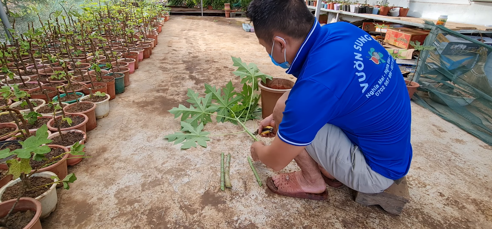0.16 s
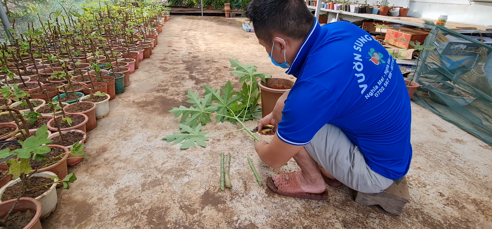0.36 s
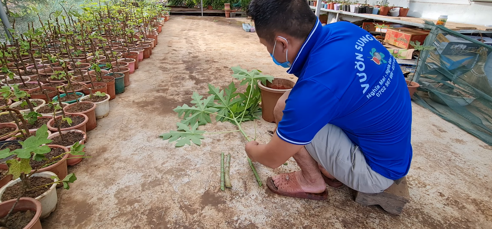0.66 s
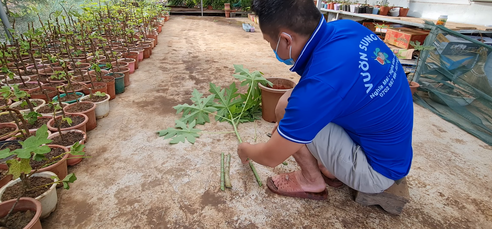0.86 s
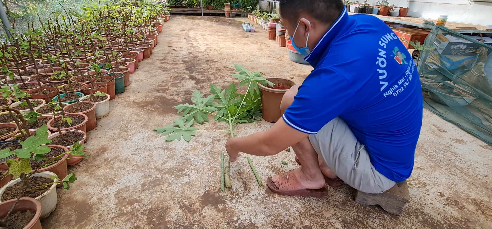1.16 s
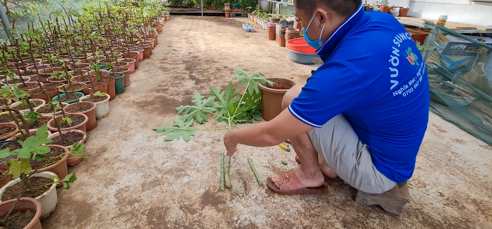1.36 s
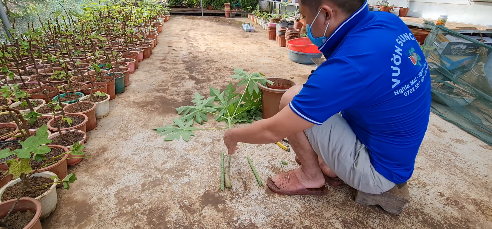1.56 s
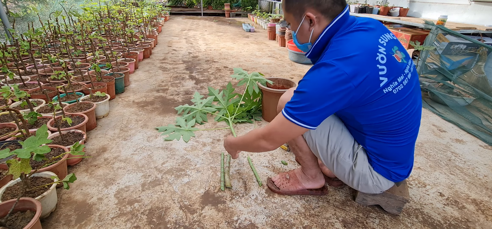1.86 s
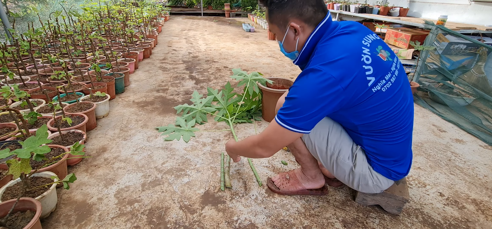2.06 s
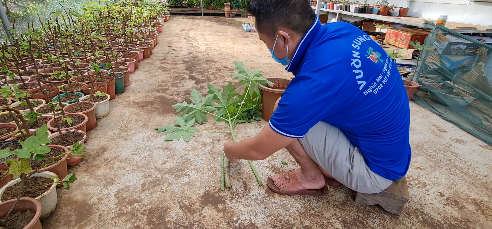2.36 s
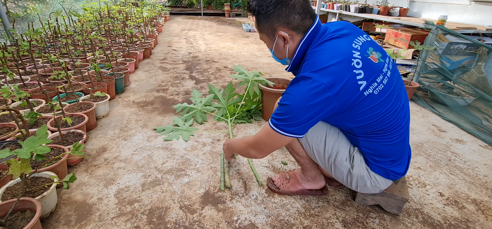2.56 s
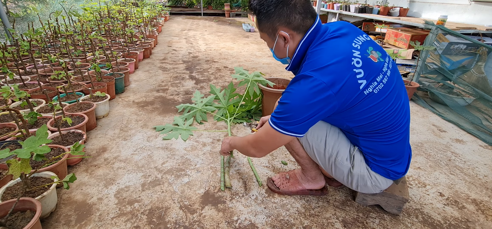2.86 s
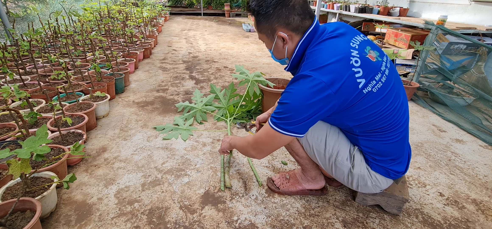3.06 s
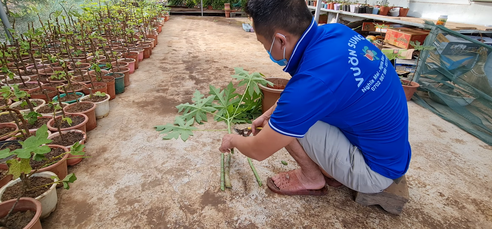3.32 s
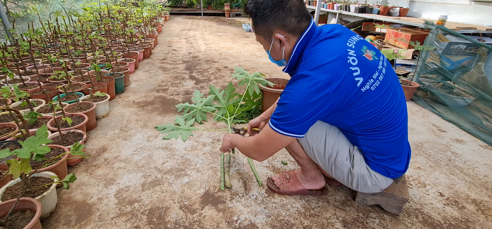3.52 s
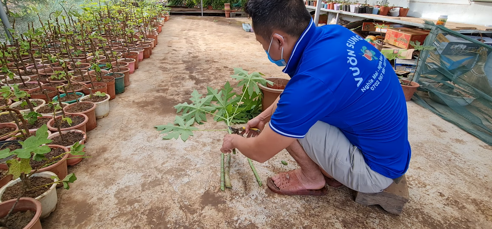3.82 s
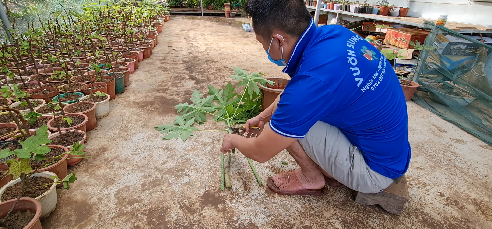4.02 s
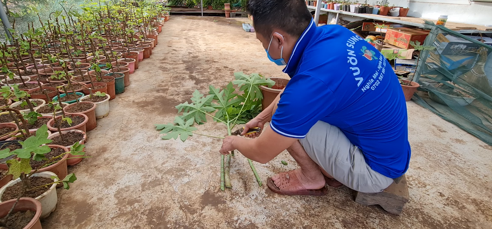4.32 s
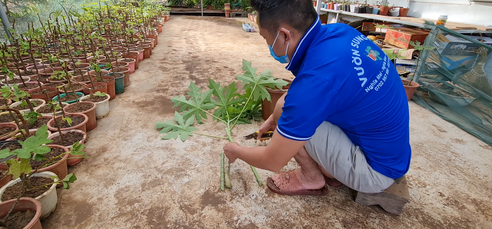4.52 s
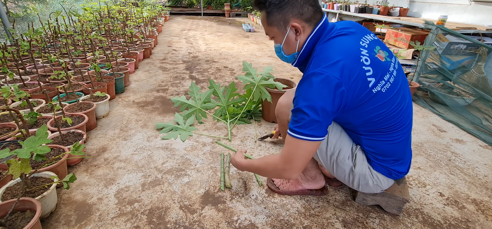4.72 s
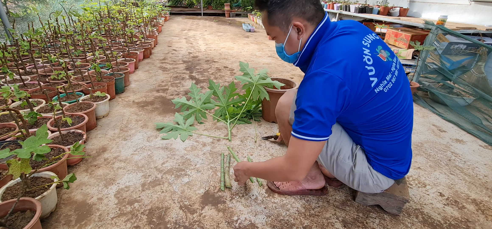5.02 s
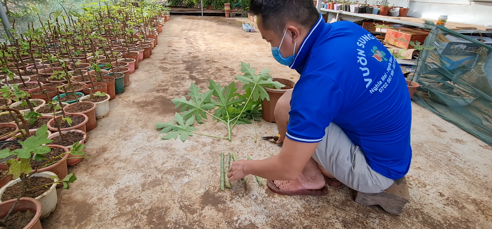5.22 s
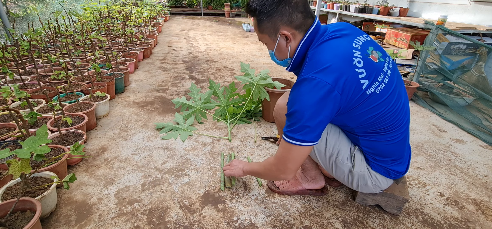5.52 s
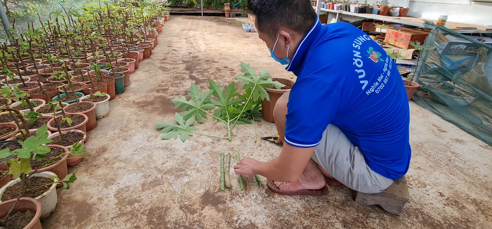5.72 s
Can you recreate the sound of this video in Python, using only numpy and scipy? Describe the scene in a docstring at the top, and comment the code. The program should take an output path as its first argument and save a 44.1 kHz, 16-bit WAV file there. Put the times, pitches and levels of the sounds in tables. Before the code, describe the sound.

Leaves rustle faintly close to the microphones in a roofed plant nursery. At about 0.7 seconds pruning shears crunch into a green stem and snap shut, and the stem cracks and knocks loudly until about 0.9 seconds, with a short echo from the roof. A sandal scrapes softly on gritty concrete just after 1 second. Between 2.1 and 2.8 seconds come lighter knocks, clicks of the shears and a little leaf rustle. At about 4.3 seconds a brief crunch ends in the second cut, one sharp, bright snap with a short metallic ring. Small ticks and a dull bump follow until 4.8 seconds. Around 5.7 seconds a few soft bumps land with two tiny pings. Throughout, the background stays very quiet: open air, pulsing insects, a machine's hum and a distant engine that swells now and then, with faint far animal calls from about 2.4 seconds.

```python
"""A roofed plant nursery, concrete floor, a pair of microphones close to the work.
Pruning shears cut a green stem twice: the blade crunches through wet fibres and snaps shut,
the stem cracks and knocks, and the roof answers after a short gap. Between the cuts leaves rustle,
a sandal scrapes and the shears click; two short pings sound as the last bumps land.
Far off an animal calls, over insects, an engine's drone, a machine's hum and the open air."""
import sys
import numpy as np
from scipy import signal
from scipy.fft import rfft, irfft
from scipy.io import wavfile
from scipy.ndimage import uniform_filter1d

SR = 44100
rng = np.random.default_rng(int(sys.argv[2]) if len(sys.argv) > 2 else 0)


def dump_mix(stems):
    """Bounce the given channels to the path in sys.argv[1] as a 16-bit WAV at rate SR."""
    frames = np.atleast_2d(stems).T  # one column per channel
    limited = np.clip(frames, -1, 1)  # hard clip at full scale
    pcm = np.round(limited * 32767).astype(np.int16)
    wavfile.write(sys.argv[1], SR, pcm)


N = 259308

# Blows close to the microphones. Each row: start in seconds, energy in dB, fade in seconds, treble
# tilt in dB per octave, resonance in Hz, its boost in dB, left over right in dB.
BLADE_SNAPS = [(.7720, -4.5, 0.003, -3.5, 2500, 1, -2.5), (.7733, -9.5, 0.0013, -5, 2700, 7.5, 13.5),
               (.786, -12.5, .005, -3.5, 2965, 7.5, 9.5), (2.3675, -25, 0.0079, 0, 6740, -0.5, -0.5),
               (2.552, -20.5, 0.023, -3.5, 5200, -3, 0), (2.5778, -19, 0.0036, 1, 4400, -0.5, 0),
               (2.773, -43, 0.0047, -2.5, 3340, 16, -1), (3.607, -35.5, 0.0022, -7, 1570, 20.5, -3.5),
               (4.2700, -4, 0.0015, 1.5, 3840, 3, 0), (4.2712, 5, 0.00036, 1.2, 4500, 10.5, -1),
               (4.2740, -8, 0.0018, 0.5, 4360, 4, 5.5), (4.474, -29.5, 0.0077, 5, 3070, 10.5, -1),
               (4.778, -35.5, 0.0043, -10, 6480, 8.5, 0.5), (4.824, -37, 0.0042, -9, 2900, 2, -3)]
STEM_KNOCKS = [(.7347, -16.5, 0.003, 3.5, 2190, 12, -1), (.8277, -2, 0.0011, 0, 2920, 1, 2.5),
               (.8290, 2.5, 0.0021, 1.5, 1200, 7, -2), (.9222, -6, 0.0018, -6.5, 1760, 8, -1),
               (.9238, -9, 0.0057, 6.5, 7100, 10.5, -0.5), (2.1548, -27.5, 0.013, -9.5, 2900, 11, 0.5),
               (2.224, -31, 0.029, -4, 830, 19, 3), (2.2520, -27.5, 0.0014, -4.5, 1210, 13.5, 0),
               (2.5472, -21.5, 0.0015, 0.5, 1773, 21.5, 3)]
SOFT_BUMPS = [(2.547, -38.5, 0.0041, -6, 453, 1, 0), (4.271, -24, .004, 5, 560, 8.5, -2),
              (4.588, -29, 0.0074, -3, 476, 11.5, -3), (5.647, -33, .005, 5.5, 354.7, 9, -1.5),
              (5.703, -40.5, 0.0027, 7, 729, 9, -2), (5.754, -36.5, 0.0021, 4.5, 566, 14, -4)]
# The ring of the blades, and the short ring in the room after a knock. Each row: centre in Hz,
# width in Hz, level in dB, seconds to fall 60 dB.
BLADE_MODES = [(2915, 600, -5, 0.31), (4300, 380, -8, 0.18), (5900, 380, -3, .21)]
KNOCK_RING = [(767, 22, -5.5, 0.1563), (1182, 140, -9.5, 0.48), (1405, 70, -7, 0.19),
              (2892, 120, -13.5, 0.2)]
# Strokes of friction. Each row: start in seconds, length in seconds, peak level in dB.
SLICE_STROKES = [(.736, .095, -49.5), (4.208, 0.062, -42)]
LEAF_STROKES = [(-.05, 0.13, -66), (.13, 0.34, -72.5), (.42, 0.23, -61.5), (.54, 0.39, -63),
                (.9, 0.76, -73), (1.83, 0.11, -73), (2.19, .11, -64.5), (2.27, .2, -69),
                (2.94, 0.14, -76.5), (3.0, 1.76, -82.5)]
SANDAL_STROKES = [(.07, .2, -77.5), (.45, 0.21, -68.5), (1.08, .255, -54), (1.63, 0.2, -76.5),
                  (1.89, 0.073, -70), (2.09, 0.29, -70)]
# Tone colour of each source and of the roof's echo. Each row: frequency in Hz, relative level in dB.
BLADE_SPECTRUM = [(150, -35.5), (420, -27), (700, -13.5), (1000, -19.5), (1600, -14), (2400, -7),
                  (4500, -4.5), (6200, -2.5), (8500, -11.5), (15000, -16.5)]
KNOCK_SPECTRUM = [(120, -27), (290, -6), (490, -17.5), (780, 3), (1400, -1), (2200, -1.5), (3200, 0),
                  (5000, -7.5), (9000, -13), (15000, -24)]
BUMP_SPECTRUM = [(60, -9.5), (200, 0.5), (400, -3.5), (650, -8), (1000, -23), (3000, -41), (12000, -59)]
SLICE_SPECTRUM = [(200, -17.5), (500, -18.5), (900, -5.5), (2000, -1), (3000, 0), (4500, -7.5),
                  (7000, -4.5), (10000, -15), (15000, -27.5)]
LEAF_SPECTRUM = [(300, -5.5), (900, -10), (2000, 0), (3500, -6.5), (6500, -2), (9000, -8.5), (15000, -16.5)]
SANDAL_SPECTRUM = [(200, -8.5), (550, -6), (800, 0.5), (1250, 3), (1900, -1.5), (2700, -11), (4500, -21),
                   (8000, -41), (15000, -55)]
ECHO_SPECTRUM = [(150, -6), (500, -7), (850, -7.5), (1300, -3), (3000, -5.5), (6000, -5), (10000, -7),
                 (15000, -5)]
AIR_SPECTRUM = [(20, -25.5), (45, -1.5), (70, -1), (110, -4), (155, -16.5), (300, -13.5), (440, -17),
                (700, -13), (950, -18), (2800, -22.5), (3800, -26.5), (7000, -28), (9300, -47),
                (15500, -42)]
# The echo's decay under the roof. Each row: frequency in Hz, seconds to fall 60 dB.
ECHO_DECAY = [(200, 0.29), (800, 0.21), (2000, 0.28), (5500, .31), (9000, 0.34), (15000, .3)]
# Far animal calls, and two short pings as the bumps land. Each row: start in seconds, length in
# seconds, pitch in Hz, glide as a share of the pitch, level in dB.
CALLS_AND_PINGS = [(2.378, 0.404, 772, -0.012, -75.5), (2.68, 0.15, 750, -0.061, -77),
                   (3.075, 0.076, 686, 0.12, -75.5), (3.62, 0.06, 520, 0.001, -72.5),
                   (3.757, 0.085, 2960, 0.062, -77), (4.969, 0.23, 580, -0.0091, -80),
                   (5.285, 0.063, 742, 0.026, -74), (5.649, 0.023, 1968, -0.017, -74),
                   (5.75, 0.021, 1957, -0.019, -67)]
# Swells of the far engine. Each row: peak time in seconds, half length in seconds, rise in dB.
DRONE_SWELLS = [(0.751, 0.64, 11), (2.352, 0.32, 13.5), (3.055, 0.33, 9.5)]
# Tones of the hum and whine. Each row: frequency in Hz, level in dB, left over right in dB.
HUM_TONES = [(67, -76, -3), (197, -86.5, -2), (300, -88, -1), (5030, -95.5, -9), (5370, -93, -9),
             (5530, -95.5, -7.5), (5560, -102, -8)]
# How alike the open air is at the two microphones. Each row: frequency in Hz, likeness from 0 to 1.
AIR_LIKENESS = [(30, 1), (300, 0.56), (700, 1), (1300, 0.071), (2000, 0.039), (15000, 0.3)]


def blades():
    """Close up, steel blades snap shut or click, and ring on."""
    snaps = hits(BLADE_SNAPS, BLADE_SPECTRUM, ring_octaves=.13, tick=.1, alike_hz=12100, lag_s=6e-6)
    return ringing(snaps, BLADE_MODES)


def stem():
    """Woody cracks and knocks, followed by a short ring in the room."""
    knocks = hits(STEM_KNOCKS, KNOCK_SPECTRUM, ring_octaves=.12, tick=.38, alike_hz=4006, lag_s=4.5e-5)
    return ringing(knocks, KNOCK_RING)


def bumps():
    """Handles, hand and foot land with soft, dull blows."""
    return hits(SOFT_BUMPS, BUMP_SPECTRUM, ring_octaves=.16, tick=.94, alike_hz=3026, lag_s=4e-5)


def slicing():
    """The blade crunches as it presses through wet fibres."""
    pressure = strokes(SLICE_STROKES, skew=1.2, roundness=1)
    return rub(pressure, SLICE_SPECTRUM, slips_per_s=2500, spread_db=6, hiss=.89,
               alike_hz=3500, pan_db=-.5)


def leaves():
    """Leaves brush together, dead centre, as the plant is handled."""
    pressure = strokes(LEAF_STROKES, skew=.87, roundness=2)
    return rub(pressure, LEAF_SPECTRUM, slips_per_s=3500, spread_db=4.5, hiss=1, alike_hz=3530, pan_db=0)


def sandal():
    """A sandal grinds on gritty concrete, a little to the right."""
    pressure = strokes(SANDAL_STROKES, skew=.92, roundness=1.4)
    return rub(pressure, SANDAL_SPECTRUM, slips_per_s=350, spread_db=1.5, hiss=.54,
               alike_hz=3280, pan_db=-2.5)


def roof_echo(dry, gap_s=.0115, near_db=-3.5, roof_db=2.5, roof_s=.0077):
    """Adds weak scatter from pots and floor, then the roof's cluster of echoes and a short tail."""
    t = np.arange(SR // 2) / SR
    taps = rng.standard_normal((2, len(t))) * (rng.random((2, len(t))) < .2)
    overhead = 1 + amp(roof_db) * np.exp(-abs(t - gap_s) / roof_s) / 2
    taps *= np.where(t < gap_s, amp(near_db) * (t > .002), overhead)
    hz, when, spectra = signal.stft(taps, SR, nperseg=256)
    spectra = mic_pair(spectra, hz[:, None], likeness(hz[:, None], 900), 0)
    spectra *= amp(-60 * when / curve(ECHO_DECAY, hz)[:, None])
    energy = uniform_filter1d((abs(spectra) ** 2).sum(2, keepdims=True), size=3, axis=1)
    tail = unit_energy(signal.istft(spectra / np.sqrt(energy), SR, nperseg=256)[1])
    tint = irfft(struck_body(curve(ECHO_SPECTRUM, np.fft.rfftfreq(4096, 1 / SR))))
    response = signal.fftconvolve(tail, tint[None], axes=1)
    return dry + signal.fftconvolve(dry, response, axes=1)[:, :N]


def calls_and_pings(waver=.004, arch=.014, flutter_db=3.5):
    """Single tones that arch, waver and flutter: each far call's strongest partial, and two pings."""
    out = np.zeros((2, N))
    for start, length, hz, glide, db in CALLS_AND_PINGS:
        u = np.linspace(-1, 1, int(length * SR))
        slow_noise = unit_rms(uniform_filter1d(rng.standard_normal((2, SR)), size=700, axis=1))
        wobble, flutter = slow_noise[:, :len(u)]
        pitch = hz * (1 + glide * u / 2 - arch * u ** 2 + waver * wobble)
        tone = (1 - u ** 2) * amp(flutter_db * flutter) * np.sin(2 * np.pi * np.cumsum(pitch) / SR)
        add(out, start, amp(db) * pan(-1.6) * unit_rms(tone))
    return out


def insect(first_s, every_s, length_s, centre_hz, width_hz, climb_hz, slope_db, same, pan_db):
    """One buzzing phrase at a steady pace: it swells, climbs in pitch and fades."""
    progress = np.minimum((np.arange(N) / SR - first_s) % every_s / length_s, 1)
    swell = (4 * progress * (1 - progress)) ** .8 * amp(slope_db * progress)
    return swell * band(centre_hz, width_hz, 0, same, pan_db, glide_hz=climb_hz * (progress - .5))


def insects():
    """A cricket near centre, a katydid on the left, a haze of farther katydids and a faint sizzle."""
    cricket = insect(first_s=-.03, every_s=.93, length_s=.58, centre_hz=4700, width_hz=340,
                     climb_hz=81, slope_db=2, same=.37, pan_db=-1)
    katydid = insect(first_s=-.5, every_s=.84, length_s=.8, centre_hz=7865, width_hz=600,
                     climb_hz=837, slope_db=-4.5, same=.15, pan_db=7)
    chorus = band(centre_hz=7850, width_hz=970, wander_hz=40, same=.15, pan_db=8.3)
    sizzle = band(centre_hz=10800, width_hz=1100, wander_hz=100, same=.11, pan_db=-2)
    return amp(-81) * cricket + amp(-80.5) * katydid + amp(-84) * chorus + amp(-96) * sizzle


def engine(base_db=-78):
    """A distant engine drones low and swells now and then."""
    t = np.arange(N) / SR
    rise_db = sum(db * np.exp(-((t - peak) / half) ** 2) for peak, half, db in DRONE_SWELLS)
    return band(centre_hz=110, width_hz=30, wander_hz=8, same=1, pan_db=-1.3) * amp(base_db + rise_db)


def machine_hum(waver=.23):
    """To the right, a machine's hum and a thin electric whine waver in level and phase."""
    t, out = np.arange(N) / SR, np.zeros((2, N))
    for hz, db, pan_db in HUM_TONES:
        sway = waver * drift(count=30)
        out += amp(db) * pan(pan_db) * np.sqrt(2) * (1 + sway) * np.sin(2 * np.pi * hz * t + sway)
    return out


def open_air(rumble_db=-71, wash_db=-71.5, patch_db=4.5, pan_db=-2, split_hz=350, lag_s=4e-4):
    """Outdoor rumble and wash with drifting patches, arriving from the right."""
    hz = np.fft.rfftfreq(1024, 1 / SR)
    grid = (N // 256 + 5, len(hz))

    def noise(shape, patchy_db):
        spectra = rng.standard_normal((2, *grid)) + 1j * rng.standard_normal((2, *grid))
        patches = uniform_filter1d(rng.standard_normal(grid), size=20, axis=0)
        patches = unit_rms(uniform_filter1d(patches, size=3, axis=1))
        spectra = mic_pair(spectra, hz, curve(AIR_LIKENESS, hz), lag_s)
        spectra *= shape * amp(patchy_db * patches)
        return unit_rms(signal.istft(spectra.swapaxes(1, 2), nperseg=1024, noverlap=768)[1][:, :N])

    low_share = 1 / (1 + (hz / split_hz) ** 4)
    colour = amp(curve(AIR_SPECTRUM, hz))
    low_cut = signal.butter(2, 35, "high", fs=SR, output="sos")
    rumble = signal.sosfilt(low_cut, noise(colour * np.sqrt(low_share), patchy_db=.97))
    wash = noise(colour * np.sqrt(1 - low_share), patch_db / (1 + hz / 3000))
    return (amp(rumble_db) * rumble + amp(wash_db) * wash) * pan(pan_db)


def hits(rows, colour, ring_octaves, tick, alike_hz, lag_s, rise_s=.00013, size=4096):
    """Each blow is a sharp tick and a fast-fading crackle, coloured by the body it excites."""
    out, t, hz = np.zeros((2, N)), np.arange(size) / SR, np.fft.rfftfreq(size, 1 / SR)
    for start, db, fade, tilt_db, ring_hz, ring_db, pan_db in rows:
        envelope = np.exp(-t / fade) * (1 - np.exp(-t / rise_s))
        crackle = unit_energy(rng.standard_normal((2, size)) * envelope)
        crackle[:, 0] += tick
        spectra = mic_pair(rfft(crackle), hz, likeness(hz, alike_hz), lag_s)
        uneven_db = 10 * np.log10(uniform_filter1d((abs(spectra) ** 2).mean(0), size=24))
        resonance_db = ring_db / (1 + (np.log2((hz + 20) / ring_hz) / ring_octaves) ** 2)
        body_db = curve(colour, hz) + tilt_db * np.log2(1 + hz / 1000) + resonance_db
        blow = irfft(spectra * struck_body(body_db - uneven_db))  # only the body colours the blow
        add(out, start, amp(db) * pan(pan_db) * unit_energy(blow[:, :size // 2]))
    return out


def ringing(blows, clusters, count=9):
    """Clusters of close modes ring on and beat after each blow."""
    t, ring = np.arange(SR // 2) / SR, np.zeros((2, SR // 2))
    for hz, width, db, t60 in clusters:
        modes = hz + width * (np.linspace(-.5, .5, count) + rng.uniform(.11, .56, count) / count)
        tones = np.sin(2 * np.pi * (modes[:, None] * t + rng.random((2, count, 1)))).sum(1)
        ring += amp(db) * unit_energy(tones * amp(-60 * t / t60)) * np.sqrt(2 * width / SR)
    return blows + signal.oaconvolve(blows, ring, axes=1)[:, :N]


def strokes(rows, skew, roundness):
    """The pressure of each stroke swells and eases in one arch, peaking late when skew is over 1."""
    t, power = np.arange(N) / SR, np.zeros(N)
    for start, length, db in rows:
        progress = np.clip((t - start) / length, 0, 1)
        power += amp(2 * db) * abs(np.sin(np.pi * progress ** skew)) ** (2 * roundness)
    return np.sqrt(power)


def rub(pressure, colour, slips_per_s, spread_db, hiss, alike_hz, pan_db):
    """Friction: many tiny slips of uneven size over a fine hiss."""
    hz = np.fft.rfftfreq(N, 1 / SR)
    sizes = amp(spread_db * np.minimum(rng.exponential(1, (2, N)), 4)) * rng.choice([-1, 1], (2, N))
    slips = unit_rms(sizes * (rng.random((2, N)) < slips_per_s / SR))
    friction = slips + hiss * rng.standard_normal((2, N))
    spectra = mic_pair(rfft(friction), hz, likeness(hz, alike_hz), lag_s=5e-5) * amp(curve(colour, hz))
    return unit_rms(irfft(spectra, N)) * pressure * pan(pan_db)


def band(centre_hz, width_hz, wander_hz, same, pan_db, glide_hz=0, lag_s=.00046):
    """A fuzzy tone of narrow noise whose pitch may wander or glide."""
    hz = np.fft.rfftfreq(N, 1 / SR)
    spectra = mic_pair(rfft(rng.standard_normal((2, N))), hz, same, lag_s)
    spectra /= (1 + (2 * (hz - centre_hz) / width_hz) ** 2) ** 1.4
    shift = np.exp(2j * np.pi * np.cumsum(glide_hz + wander_hz * drift(count=24)) / SR)
    return unit_rms((np.fft.ifft(spectra, N) * shift).real) * pan(pan_db)


def struck_body(db, size=4096):
    """The minimum-phase spectrum of a body that rings only after it is struck."""
    log_gain = np.log(amp(np.r_[db, db[-2:0:-1]]))
    return np.exp(np.conj(signal.hilbert(log_gain)))[:size // 2 + 1]


def mic_pair(spectra, hz, same, lag_s):
    """Two microphones, alike by the share `same`, the left one lag_s late."""
    same = np.clip(same, 0, 1)
    left = spectra[0] * np.exp(-2j * np.pi * hz * lag_s)
    right = same * spectra[0] + np.sqrt(1 - same ** 2) * spectra[1]
    return np.array([left, right])


def likeness(hz, alike_hz):
    """Long waves reach both microphones alike; likeness is one half at alike_hz."""
    return 1 / (1 + (hz / alike_hz) ** 2)


def drift(count):
    """A slow random wander through count values."""
    return np.interp(np.linspace(0, count - 1, N), np.arange(count), rng.standard_normal(count))


def curve(points, hz):
    """A table's value at hz, on a log-frequency scale."""
    point_hz, value = np.transpose(points)
    return np.interp(np.log(hz + 1), np.log(point_hz + 1), value)


def add(mix, start_s, sound):
    part = mix[:, round(start_s * SR):][:, :sound.shape[1]]
    part += sound[:, :part.shape[1]]


def pan(left_over_right_db):
    return amp([[left_over_right_db / 2], [-left_over_right_db / 2]])


def amp(db):
    return 10 ** (np.asarray(db) / 20)


def unit_rms(x):
    return x / np.sqrt(np.mean(x ** 2) + 1e-20)


def unit_energy(x):
    return x / np.linalg.norm(x, axis=1, keepdims=True)


def scene():
    """The close work and the far calls echo under the roof; the outdoor background lies around them."""
    work = blades() + stem() + bumps() + slicing() + leaves() + sandal()
    return roof_echo(work + calls_and_pings()) + open_air() + insects() + engine() + machine_hum()


def record(dry):
    """The recorder passes nothing much above 16.1 kHz."""
    low_pass = signal.firwin(401, 16100, window=("kaiser", 8), fs=SR)
    return signal.oaconvolve(dry, low_pass[None], "same")


dry = scene()
out = record(dry)
dump_mix(out)
```